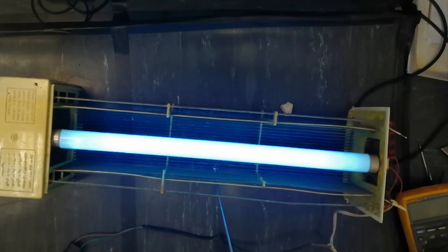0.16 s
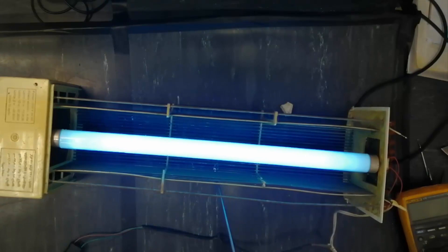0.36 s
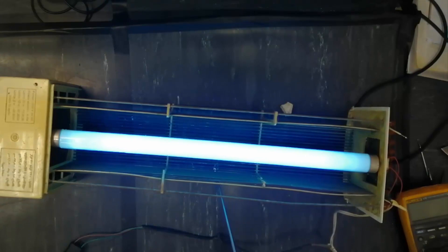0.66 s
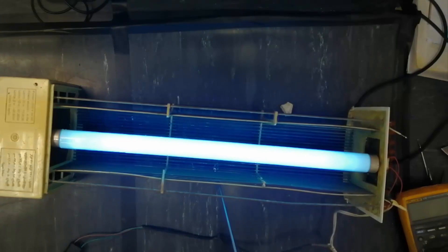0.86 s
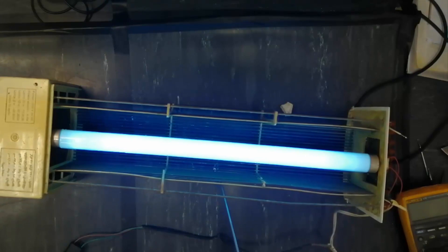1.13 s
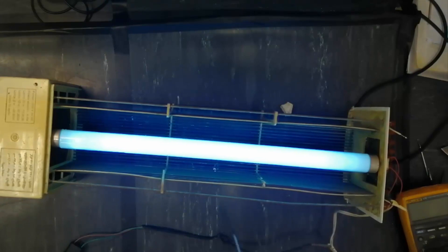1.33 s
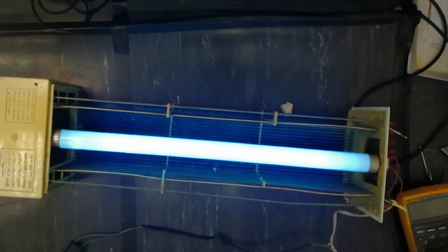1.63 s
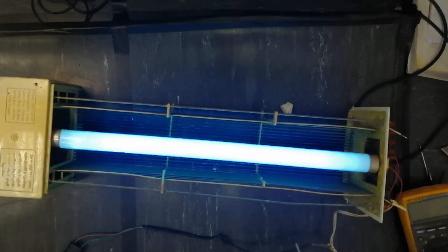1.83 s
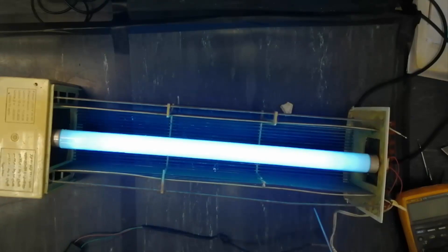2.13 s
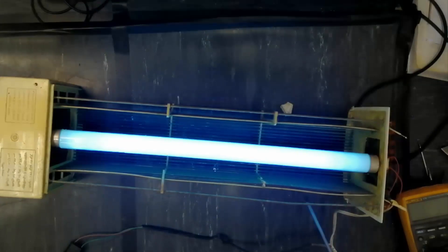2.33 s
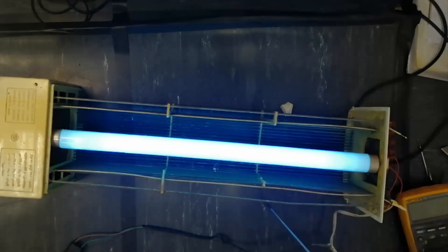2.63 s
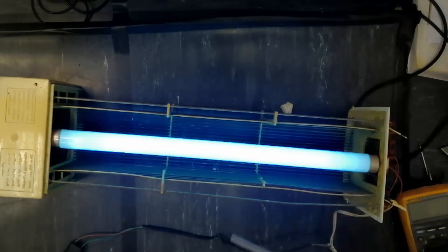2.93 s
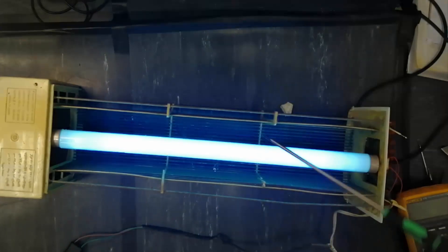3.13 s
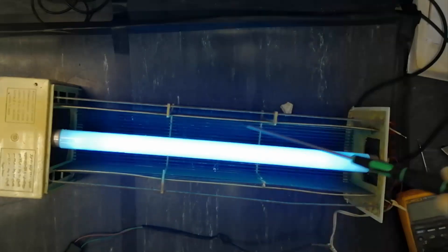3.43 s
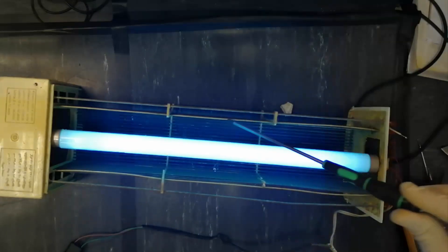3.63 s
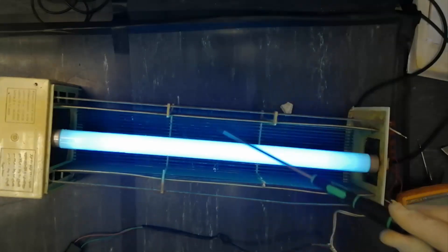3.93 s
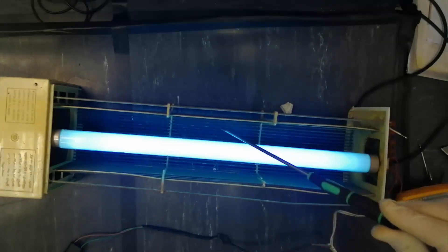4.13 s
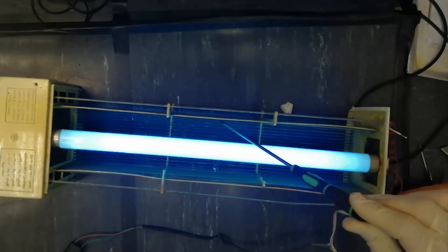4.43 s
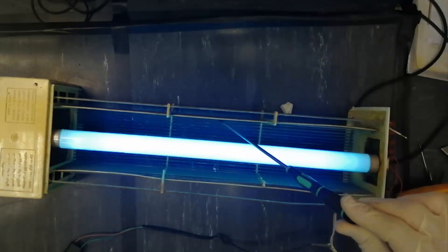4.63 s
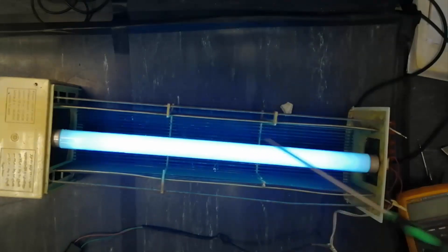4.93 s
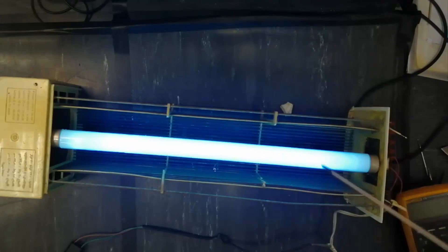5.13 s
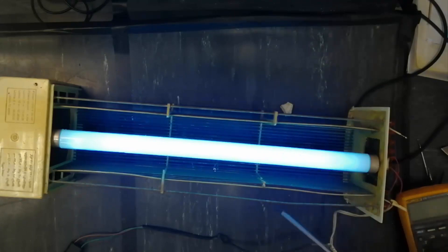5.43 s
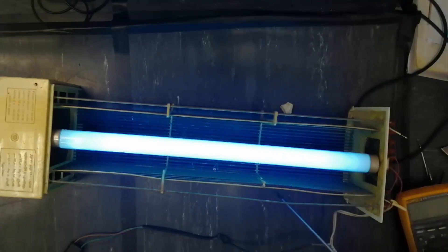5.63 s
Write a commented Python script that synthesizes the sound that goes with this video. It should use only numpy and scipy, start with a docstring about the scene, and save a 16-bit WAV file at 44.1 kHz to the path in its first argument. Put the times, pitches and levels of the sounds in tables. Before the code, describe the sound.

Two deafening high-voltage snaps, seconds apart, ring briefly through a small workshop over quiet low hum, with tiny tool and sleeve noises between.

```python
"""From the start a mains bug zapper hums on a workshop bench, over steady filtered noise and a low rumble.
At 1.1 s its high-voltage grid arcs over to a screwdriver: one crack, made of delayed impulses, decaying
noise and damped sines, overloads the close microphone and rings through the room; the limiter ducks and recovers.
From about 1.9 to 4 s the hand bumps dully, a sleeve rustles faintly (shaped noise) as the tool is moved,
and the tool ticks (resonant noise bursts). At 4.6 s the grid arcs a second time."""
import sys
import numpy as np
from scipy import signal
from scipy.fft import rfft, irfft
from scipy.io import wavfile
from scipy.ndimage import uniform_filter1d, minimum_filter1d

SR = 44100
rng = np.random.default_rng(int(sys.argv[2]) if len(sys.argv) > 2 else 0)


def bounce(signal):
    """Save signal as a 16-bit WAV file at the path given by the first command-line argument."""
    frames = np.transpose(np.atleast_2d(signal))
    limited = np.clip(frames, -1, 1)
    pcm = np.round(limited * 32767).astype(np.int16)
    wavfile.write(sys.argv[1], SR, pcm)


N = 254080
TIME = np.arange(N) / SR  # seconds
MAINS_HZ = 49.9
TILT_PIVOT_HZ = 497  # the tilt of the spark's body turns about this frequency
CUTOFF_HZ = 15800  # top of the recorded band

# workshop air, relative spectrum: frequency_hz, density_db (per Hz)
AIR_SPECTRUM = [(30, -1), (100, 1), (200, -1.5), (300, 1), (420, -1), (650, -2.5), (1000, -8.5),
                (1600, -18.5), (3100, -15.5), (3900, -22.5), (5500, -29.5), (8000, -37.5), (15000, -34)]
# correlation of the air noise between the ports: frequency_hz, likeness (1 = identical)
AIR_LIKENESS = [(60, 1), (290, 0.99), (640, .55), (1400, 0.028), (15000, 0.23)]
# swells of the low rumble: centre_s, spread_s, rise_db (over the resting level)
RUMBLE_SWELLS = [(.1, .08, 8), (.6, .075, 9.5), (1.02, .06, 4.5), (1.846, .2, 10), (2.434, .05, 7.5),
                 (3.35, .08, 2), (4.423, .1, 6), (5.32, 0.15, 8.5)]
# ballast and transformer hum: mains_multiple, level_db (relative sine amplitude), waver_db
HUM_LINES = [(2, -75.5, 4), (4, -59, 0.5), (6, -70.5, 4), (8, -82.5, 4.5), (10, -71.5, 4)]
# soft bumps of the hand: centre_s, level_db (rms at the top, before the port balance)
HAND_BUMPS = [(1.93, -59.5), (2.04, -63)]
# sleeve strokes: centre_s, spread_s, hiss_db, scuff_db (both relative)
SLEEVE_STROKES = [(1.98, 0.022, -75, -83), (2.497, 0.081, -77, -84), (2.668, 0.041, -69.5, -85),
                  (3.306, 0.054, -73.5, -71), (3.794, 0.032, -83.5, -61), (3.867, 0.021, -78, -70),
                  (3.97, 0.059, -76, -63)]
# small ticks of the tool in the hand: start_s, level_db (relative)
TOOL_TICKS = [(2.459, -67), (2.64, -58), (3.285, -58), (3.303, -50.5), (3.316, -50), (3.768, -60),
              (3.956, -63)]
# paths from gap to microphone, direct and off case and bench: delay_s, level_db (relative)
SPARK_PATHS = [(0, -10), (.0007, -11.5), (.0033, -13.5), (.0043, -17), (0.0127, -20), (0.0203, -25)]
# low body of the crack: pitch_hz, left_db, right_db (both relative), t60_s; pitch before the spark's factor
SPARK_BODY = [(123.4, -21, -20, 0.0092), (343.2, -5, -17, 0.012), (685, -20.5, -10, 0.018),
              (1040, -8.5, -23, 0.0044), (1990, -11, -2.5, .004)]
# room answer to a spark, relative spectrum: frequency_hz, density_db (per Hz)
ROOM_SPECTRUM = [(150, -13.5), (500, -15), (850, -15.5), (1300, -2.5), (2500, -1), (4000, 1), (6000, -1.5),
                 (10000, 2), (15000, -1)]
# time for the room to decay by 60 dB: frequency_hz, t60_s
ROOM_DECAY = [(150, 0.2), (1500, 0.22), (6000, 0.26), (10000, 0.21), (15000, 0.215)]
# sparks, whose body depends on where the arc strikes:
# start_s, strength_db, room_db, body_db, pitch_factor, tilt_db (per octave), push_db
SPARKS = [(1.107, 56, 2.5, 4.5, 1.06, 4.27, -1), (4.618, 53, -1, -4, 0.87, -5.8, -1.5)]
# resonances of the two microphone ports: frequency_hz, width_hz, level_db
LEFT_PORT = [(5600, 1400, -3), (9670, 850, 12)]
RIGHT_PORT = [(5390, 540, 9.4), (5980, 750, 11.5)]
# antiresonance shared by both ports: frequency_hz, width_hz, depth (0 to 1)
PORT_DIP = (3950, 1700, 0.57)
# stages in which the limiter lets go: share (of the overshoot in dB), rate_db_per_s
LIMITER_RELEASE = [(0.95, 169), (0.39, 40), (0.098, 3)]


def from_db(db):
    """Logarithmic level: 20 dB is a factor of ten in amplitude."""
    return 10 ** (np.asarray(db) / 20)


def rms_one(x):
    """Normalisation to unit root-mean-square amplitude."""
    return x / np.sqrt(np.mean(x ** 2) + 1e-20)


def at_hz(points, hz):
    """Linear interpolation along a logarithmic frequency axis."""
    frequency, value = np.transpose(points)
    return np.interp(np.log(np.maximum(hz, 1)), np.log(frequency), value)


def cut(x, hz, kind, order=2):
    """Causal Butterworth filtering: a maximally flat passband."""
    sections = signal.butter(order, np.minimum(hz, .49 * SR), kind, fs=SR, output="sos")
    return signal.sosfilt(sections, x + 1e-18)


def resonate(x, hz, width):
    """Two-pole resonance with unit gain at its peak; a narrower width rings longer."""
    radius = np.exp(-np.pi * width / SR)
    zeros = (1 - radius * radius) / 2 * np.array([1, 0, -1])
    poles = [1, -2 * radius * np.cos(2 * np.pi * hz / SR), radius * radius]
    return signal.lfilter(zeros, poles, x)


def drift(rate):
    """Slow random modulation: normal values joined by straight lines, rate of them a second."""
    knots = rng.standard_normal(size=1000)
    return np.interp(TIME * rate, np.arange(len(knots)), knots)


def swell(centre_s, spread_s):
    """Gaussian envelope: a smooth rise and fall of height 1."""
    return np.exp(-.5 * ((TIME - centre_s) / spread_s) ** 2)


def decay(age, t60):
    """Exponential decay that falls 60 dB in t60 seconds."""
    return np.exp(-np.log(1000) * age / t60)


def add(out, start_s, sound):
    """Superposition: a sound is summed in from its start time."""
    start = int(round(start_s * SR))
    out[..., start:start + sound.shape[-1]] += sound[..., :N - start]


def air(level_db=-61, left_db=-2.0):
    """Partial coherence: steady workshop noise is closely alike at both ports in the bass only."""
    hz = np.arange(N // 2 + 1) * SR / N
    mid, side = rfft(rng.standard_normal((2, N))) * from_db(at_hz(AIR_SPECTRUM, hz))
    alike = at_hz(AIR_LIKENESS, hz)
    # the side part enters the ports with opposite signs
    spectrum = np.sqrt(1 + alike) * mid + np.sqrt(1 - alike) * side * [[1], [-1]]
    return from_db(level_db) * rms_one(irfft(spectrum, N)) * from_db([[left_db], [0]])


def rumble(rest_db=-62, waver_db=-0.5, wavers_per_s=5, hz=46, width_hz=16, top_hz=85):
    """Noise through one deep resonance, mostly on the right; it wavers about rest and sometimes swells."""
    swells_db = sum(db * swell(s, spread) for s, spread, db in RUMBLE_SWELLS)
    level_db = rest_db + waver_db * drift(wavers_per_s) + swells_db
    noise = rms_one(cut(resonate(rng.standard_normal(N), hz, width_hz), top_hz, "low"))
    return noise * from_db(level_db) * from_db([[-8], [3.5]])


def hum():
    """Iron cores buzz at even multiples of the mains, the fourth strongest; the weaker lines waver."""
    lines = 0
    for multiple, db, waver_db in HUM_LINES:
        phase = 2 * np.pi * (multiple * MAINS_HZ * TIME + rng.random())
        lines = lines + from_db(db + waver_db * drift(16)) * np.sin(phase)
    return lines * from_db([[-2], [1.5]])


def bumps(hz=115, width_hz=90, spread_s=0.029):
    """Resonant low noise in short envelopes: dull knocks of the hand that holds the microphone."""
    level = sum(from_db(db) * swell(s, spread_s) for s, db in HAND_BUMPS)
    return level * rms_one(resonate(rng.standard_normal(N), hz, width_hz)) * from_db([[-6], [0]])


def from_right(x, lag_s=.00027):
    """Interaural-style delay: a sound from the right reaches the left port a little later."""
    return np.array([np.roll(x[0], int(round(lag_s * SR))), x[1]])


def sleeve(grain_db=1.5, cloth_db=-4, low_hz=3200, high_hz=8000, scuff_hz=850, scuff_width_hz=300):
    """Friction noise: cloth rubs in short grainy strokes, a hiss over a dull scuff."""
    hiss, scuff, grain = 0, 0, from_db(grain_db * drift(65))
    for s, spread, hiss_db, scuff_db in SLEEVE_STROKES:
        stroke = from_db(cloth_db) * grain * swell(s, spread)
        hiss = hiss + from_db(hiss_db) * stroke
        scuff = scuff + from_db(scuff_db) * stroke
    bright = rms_one(cut(rng.standard_normal((2, N)), [low_hz, high_hz], "band", order=1))
    dull = rms_one(resonate(rng.standard_normal((2, N)), scuff_hz, scuff_width_hz))
    return (hiss * bright + scuff * dull) * from_db([[-2.5], [0]])


def ticks(level_db=-10, fall_s=0.0042, hz=4500, width_hz=1500):
    """Broad resonance under a fast exponential fall: the screwdriver ticks in the hand."""
    level = np.zeros(N)
    for s, db in TOOL_TICKS:
        add(level, s, from_db(db + level_db) * np.exp(-TIME[:SR // 10] / fall_s))
    return level * rms_one(resonate(rng.standard_normal((2, N)), hz, width_hz)) * from_db([[-2.5], [0]])


def room_tail(age, build_s=.002, patchy_db=0.64, patches_per_s=70):
    """Diffuse reverberation, unrelated at the ports: each third of an octave clumps and decays on its own."""
    edges = np.geomspace(100, 17000, 23)
    white, tail, power = rng.standard_normal((2, 2, len(age))), 0, 0
    for k, (low, high) in enumerate(zip(edges, edges[1:])):
        hz = np.sqrt(low * high)
        # neighbouring bands take turns between two independent noises
        band = from_db(at_hz(ROOM_SPECTRUM, hz)) * cut(white[k % 2], [low, high], "band")
        clumps = from_db(patchy_db * drift(patches_per_s)[:len(age)])
        tail = tail + band * clumps * decay(age, at_hz(ROOM_DECAY, hz))
        power += np.mean(band ** 2)
    return tail / np.sqrt(power) * (1 - np.exp(-age / build_s))


def push(age, fall_s=0.0018, rise_s=0.0013):
    """Blast pressure displaces the diaphragm off centre for a moment, mainly the right one."""
    return -np.exp(-age / fall_s) * (1 - np.exp(-age / rise_s)) * from_db([[-20], [0]])


def body(age, pitch_factor, tilt_db, rise_s=.0004):
    """Modal synthesis: a few heavily damped low rings, opposed at the two ports."""
    rings = 0
    for hz, left_db, right_db, t60 in SPARK_BODY:
        level_db = np.array([[left_db], [right_db]]) + tilt_db * np.log2(hz / TILT_PIVOT_HZ)
        rings = rings + from_db(level_db) * np.sin(2 * np.pi * pitch_factor * hz * age) * decay(age, t60)
    return rings * [[1], [-1]] * (1 - np.exp(-age / rise_s))


def crack(age, shock_db=7, scatter_db=-13, scatter_t60=0.037, low_hz=1150, high_hz=11000):
    """Multipath: a shock front arrives along a few paths, smeared by scatter off grid wires and clutter."""
    front = np.zeros(len(age))
    for delay_s, db in SPARK_PATHS:
        front[int(delay_s * SR)] += from_db(db + shock_db)
    scatter = rng.standard_normal((2, len(age))) * from_db(scatter_db) * decay(age, scatter_t60)
    # the tiny arc radiates little bass, and its front has a finite rise time
    return cut(cut(front + scatter, low_hz, "high"), high_hz, "low", order=1)


def sparks(tail_db=-28):
    """Capacitive discharge: the grid capacitor dumps its charge in a single arc."""
    out, age = np.zeros((2, N)), np.arange(SR) / SR
    for s, db, room_db, body_db, pitch_factor, tilt_db, push_db in SPARKS:
        thump = from_db(body_db) * body(age, pitch_factor, tilt_db) + from_db(push_db) * push(age)
        echo = from_db(tail_db + room_db) * room_tail(age)
        add(out, s, from_db(db) * (crack(age) + thump + echo))
    return out


def scene():
    """Linear superposition of everything that reaches the microphone."""
    return from_right(air() + rumble() + hum() + bumps()) + sleeve() + ticks() + sparks()


def port(x, modes):
    """Cavity resonance: a microphone's sound hole adds treble peaks, with a dip below them."""
    dip_hz, dip_width_hz, depth = PORT_DIP
    x = x + sum(from_db(db) * resonate(x, hz, width) for hz, width, db in modes)
    return x - depth * resonate(x, dip_hz, dip_width_hz)


def limiter(x):
    """Gain drops just ahead of a peak over full scale; most returns fast, drawing out the echo, the rest slowly."""
    over_db = np.maximum(20 * np.log10(np.abs(x).max(axis=0) + 1e-9), 0)
    # each stage holds its share of the overshoot and lets go at a constant rate
    held_db = [np.maximum.accumulate(share * over_db + rate * TIME) - rate * TIME
               for share, rate in LIMITER_RELEASE]
    gain_db = -np.max(held_db, axis=0)
    # the centred windows (in samples) give the look-ahead and round off the steps
    return x * from_db(uniform_filter1d(minimum_filter1d(gain_db, size=129), size=65))


def record(dry, hiss_db=-84, overload_db=61):
    """Transducer chain: port resonances, self-noise, overload, limiter, blocked DC and a cut top."""
    x = np.array([port(dry[0], LEFT_PORT), port(dry[1], RIGHT_PORT)])
    x = x + from_db(hiss_db) * rng.standard_normal((2, N))
    ceiling = from_db(overload_db)
    x = limiter(ceiling * np.tanh(x / ceiling))
    x = cut(x, 1.8, "high", order=1)
    return cut(np.clip(x, -1, 1), CUTOFF_HZ, "low", order=20)


dry = scene()
out = record(dry)
bounce(out)
```